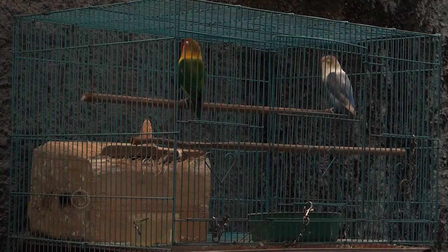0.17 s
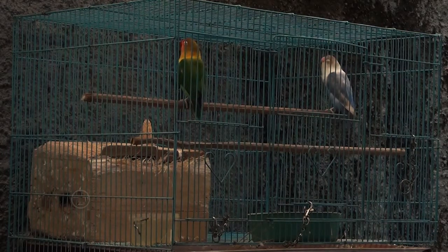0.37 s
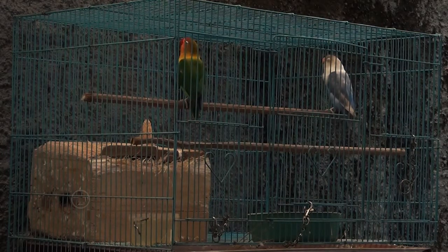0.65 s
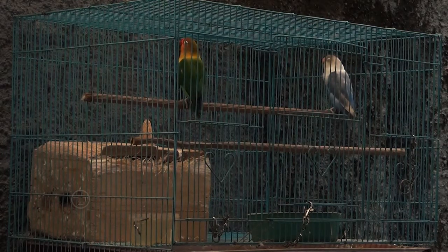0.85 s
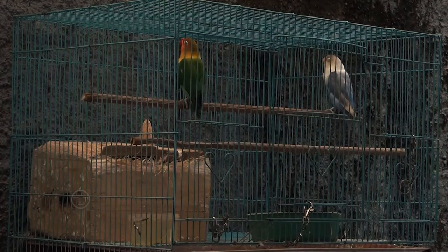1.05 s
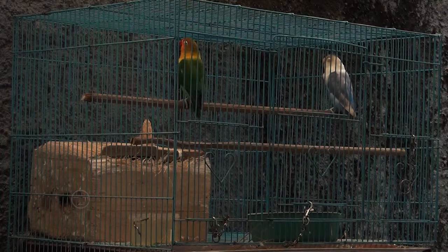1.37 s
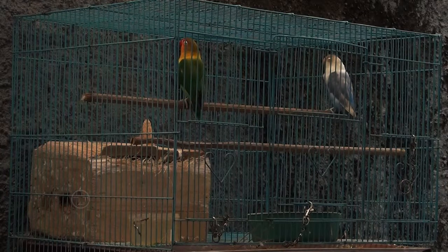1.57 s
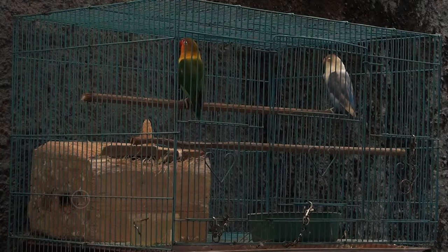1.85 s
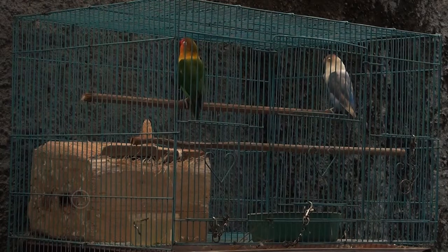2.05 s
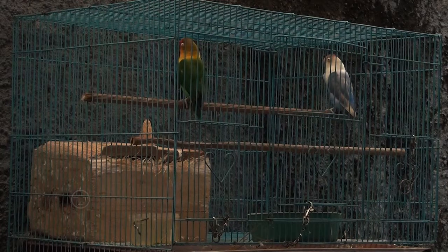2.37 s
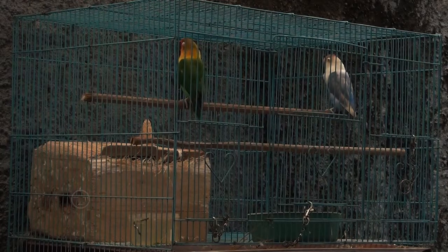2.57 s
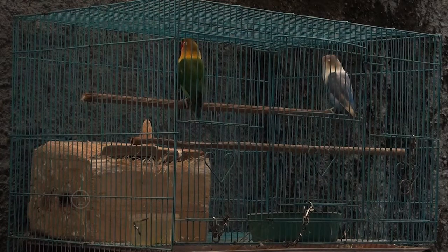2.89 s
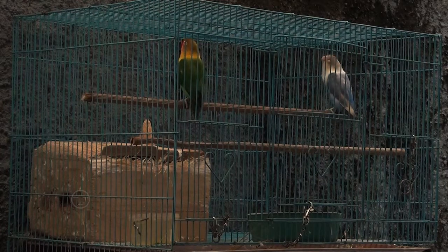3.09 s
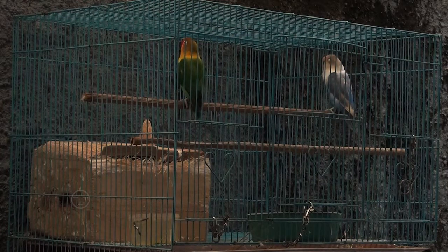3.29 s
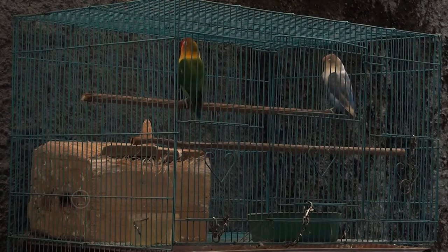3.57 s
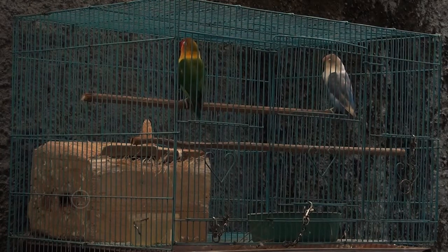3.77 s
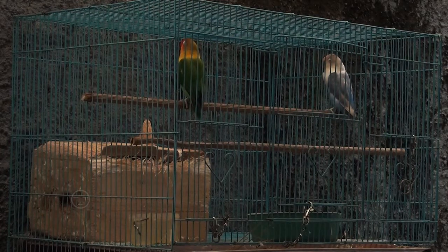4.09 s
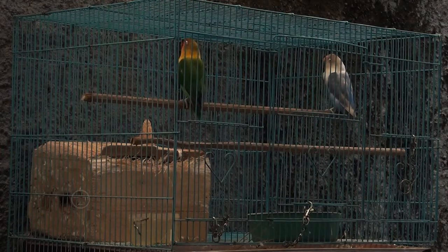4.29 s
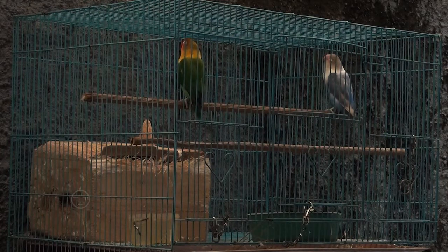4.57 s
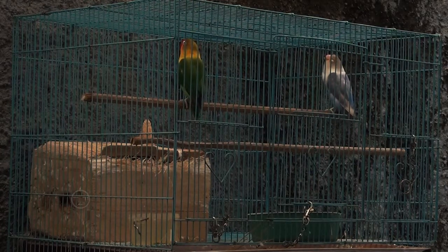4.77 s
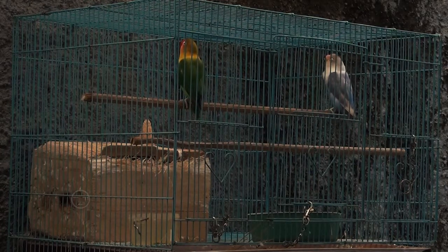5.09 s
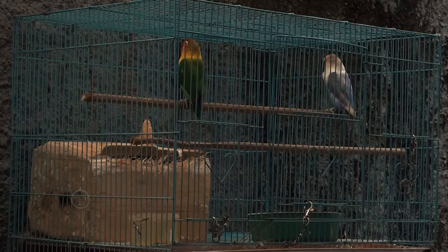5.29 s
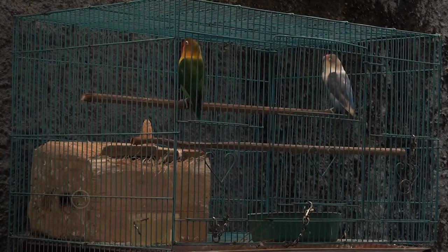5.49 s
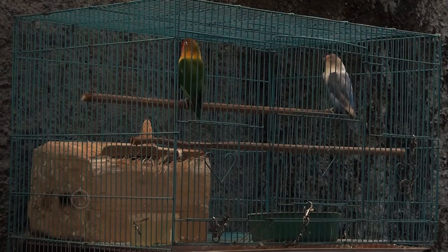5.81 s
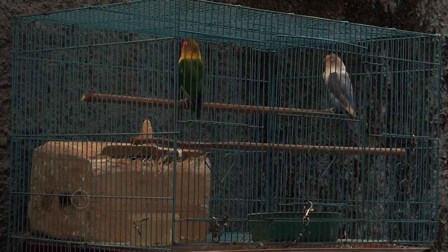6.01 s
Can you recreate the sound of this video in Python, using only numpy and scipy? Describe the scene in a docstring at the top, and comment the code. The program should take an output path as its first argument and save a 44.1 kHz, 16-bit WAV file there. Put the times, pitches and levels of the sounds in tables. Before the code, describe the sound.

Two lovebirds call from a wire cage straight ahead, with hard walls adding a short ring to every sound. Faint, dull outdoor noise and a far-off idling engine continue underneath for all six seconds. Two quick bursts of shrill chirps come at about 0.2 and 0.7 seconds. A very faint, distant tone sounds briefly at 1.3 seconds. A lower chirp follows at 2.1 and a thin squeak at 2.7. From 3 to 3.5 seconds there is rapid chatter, tiny sliding notes breaking from whistle into rasp, with dry ticks between them. A few light taps hit the cage wires around 4.4 seconds. A second run of chatter lasts from 4.6 to 5.2 seconds. A short, clear whistle comes at 5.6, and a last quiet chirp at about 6. The birds are much louder than the background, which dips slightly after the loudest calls.

```python
"""Two lovebirds call in a wire cage between hard walls, over outdoor noise and a far-off idling engine.
First come two chirps, a faint distant tone, a low chirp and a squeak. A run of chatter follows at 3 s,
then taps on the wires, more chatter at 4.6 s, a clear whistle and a last quiet chirp.
Each bird's voice box makes quick slides in pitch that break from whistle into rasp, with dry ticks between.
The walls ring after every call, and an automatic volume control turns the loud ones down."""
import sys
import numpy as np
from scipy import signal
from scipy.fft import rfft, irfft, next_fast_len
from scipy.io import wavfile
from scipy.ndimage import uniform_filter1d, minimum_filter1d

SR = 44100
rng = np.random.default_rng(int(sys.argv[2]) if len(sys.argv) > 2 else 0)


def generate_wav(signal):
    """Clip the signal to [-1, 1] and save it as 16-bit WAV at the path in sys.argv[1]."""
    frames = np.transpose(np.atleast_2d(signal))
    scaled = np.clip(frames, -1, 1) * 32767
    pcm = np.round(scaled).astype(np.int16)
    wavfile.write(sys.argv[1], SR, pcm)


N = 270774
CUTOFF_HZ = 16000  # top of the treble
ATTACK_S, RELEASE_S = .002, .003  # fade-in and fade-out of every bird note


def from_db(db):
    """Turn decibels into a number to multiply by."""
    return 10 ** (np.asarray(db) / 20)


def rms_one(x):
    """Scale a signal to an average power of 1."""
    return x / np.sqrt(np.mean(x ** 2) + 1e-20)


def at_hz(points, hz):
    """Read between a table's rows, giving every octave equal room."""
    freqs, values = np.transpose(points)
    return np.interp(np.log(np.maximum(hz, 1)), np.log(freqs), values)


def coloured(spectrum, size):
    """Noise of power 1, its bass and treble shaped by a table."""
    hz = np.fft.rfftfreq(size, 1 / SR)
    return rms_one(irfft(rfft(rng.standard_normal(size)) * from_db(at_hz(spectrum, hz)), size))


def wobble(rate_hz, size):
    """A smooth random wiggle of about 1 either way, mostly slower than rate_hz."""
    padded = next_fast_len(size + SR // 8)
    hz = np.fft.rfftfreq(padded, 1 / SR)
    slow_spectrum = rfft(rng.standard_normal(padded)) / (1 + (hz / rate_hz) ** 2)
    return rms_one(irfft(slow_spectrum, padded))[:size]


def gate(t, length_s, attack_s, release_s):
    """Fade in, hold, fade out."""
    ramp = np.clip(np.minimum(t / attack_s, (length_s - t) / release_s), 0, 1)
    return np.sin(np.pi / 2 * ramp) ** 2


def add(track, s, sound):
    """Mix a sound into the track at s seconds."""
    start = int(np.clip(round(s * SR), 0, N))
    track[start:start + len(sound)] += sound[:N - start]


# The outdoor noise from bass to treble: f/Hz, relative level/dB
AIR_SPECTRUM = [(20, -66), (30, -28.5), (45, -20), (60, -2), (90, -17), (140, -6), (215, -6.5), (300, -6),
                (400, -7), (600, -7.5), (1000, -10), (1400, -11.5), (2000, -13.5), (4500, -26.5),
                (9000, -34), (16000, -35.5)]
# How the outdoor noise swells and sinks: t/s, level/dB
AIR_SWELL = [(0, -45.5), (.9, -37.5), (1.5, -40.5), (2.1, -45), (2.7, -45), (3.5, -37.5), (4, -45),
             (4.5, -42), (5.2, -42), (6.14, -41.5)]
def outdoor_air(side_db=-12):
    """Dull outdoor noise, with the same bass on the left and right."""
    t = np.arange(N) / SR
    midrange = signal.butter(3, [450, 5000], "band", fs=SR, output="sos")
    side = signal.sosfilt(midrange, coloured(AIR_SPECTRUM, N)) * [[1], [-1]]  # left +, right -
    swell = from_db(np.interp(t, *np.transpose(AIR_SWELL)))
    return swell * (coloured(AIR_SPECTRUM, N) + from_db(side_db) * side)


def far_tone(start_s=1.33, length_s=0.28, hz=808, level_db=-46.5, fade_s=0.044):
    """One faint, pure tone from far away."""
    t = np.arange(N) / SR
    tone = np.sqrt(2) * from_db(level_db) * np.sin(2 * np.pi * hz * t)
    return tone * gate(t - start_s, length_s, fade_s, fade_s)


# The tones in the engine's hum: multiple of the firing rate, relative level/dB
ENGINE_TONES = [(2, -10), (4, -12), (5, -2), (6, 1), (7, 0.5), (8, -7), (10, -4.5), (11, -5), (12, -3.5),
                (13, -1), (14, -5.5), (16, -11.5), (18, -8), (19, -8.5), (22, -18.5), (24, -13)]
# How the engine swells and sinks: t/s, level/dB
ENGINE_SWELL = [(0, -44), (.9, -38), (2, -40), (2.8, -42), (3.5, -36.5), (4, -44.5), (4.5, -42),
                (6.14, -45.5)]
def engine(firing_hz=29.65, rise_hz_per_s=.3, waver=0.0034, waver_hz=7.7,
           fading_db=3.0, scatter_rad=1.12, surge_db=2.0, surge_hz=12):
    """An engine slowly gathers speed. Its tones arrive by many paths, so each fades on its own."""
    t = np.arange(N) / SR
    rate = (firing_hz + rise_hz_per_s * t) * (1 + waver * wobble(waver_hz, N))
    phase = 2 * np.pi * np.cumsum(rate) / SR
    fade_times = np.linspace(0, t[-1], 40)
    hum = 0
    for multiple, db in ENGINE_TONES:
        fade = np.interp(t, fade_times, from_db(db + fading_db * rng.standard_normal(len(fade_times))))
        offset = scatter_rad * rng.standard_normal()  # roughly in step: a soft putter
        hum = hum + fade * np.sin(multiple * phase + offset)
    level_db = np.interp(t, *np.transpose(ENGINE_SWELL)) + surge_db * wobble(surge_hz, N)
    return rms_one(hum) * from_db(level_db)


# How long the walls ring: f/Hz, time to fade by 60 dB/s
RING_TIMES = [(1500, 0.46), (2700, 0.65), (4000, 0.57), (5500, 0.51), (8000, 0.49), (12000, 0.44),
              (16000, .35)]
def wall_ring(x, wet_db=-0.5, side_db=-10, first_echo_s=0.0039, side_cut_hz=8000):
    """Countless echoes blur into a ring, much alike left and right. The highest treble dies first."""
    t = np.arange(SR) / SR
    hz = np.fft.rfftfreq(SR, 1 / SR)
    white, tail = rfft(rng.standard_normal((2, SR))), 0
    edges = np.geomspace(500, SR / 2, 14)
    for low, high in zip(edges, edges[1:]):
        band = irfft(white * ((hz >= low) & (hz < high)), SR)
        tail = tail + band * from_db(-60 * t / at_hz(RING_TIMES, np.sqrt(low * high)))
    # scale the tail so that it neither adds nor loses energy near 6000 Hz
    tail = tail * (t > first_echo_s) * np.sqrt(2 * np.log(1000) / (SR * at_hz(RING_TIMES, 6000)))
    mid, side = signal.fftconvolve(x[None], tail, axes=1)[:, :N]
    side = signal.sosfilt(signal.butter(1, side_cut_hz, fs=SR, output="sos"), side)
    return from_db(wet_db) * (mid + from_db(side_db) * side * [[1], [-1]])


# Bounces off the nearby walls: delay/s, relative level/dB
WALL_BOUNCES = [(.0034, -11.5), (.0079, -22), (.044, -12.5)]
def wall_echoes(x, smear_s=.003):
    """Single echoes, each spread a little in time because the walls are rough."""
    out = np.zeros(N)
    for delay_s, db in WALL_BOUNCES:
        smear = rng.standard_normal(int(smear_s * SR) + 1)
        add(out, delay_s - smear_s / 2, from_db(db) * np.convolve(x, smear / np.linalg.norm(smear)))
    return out


# Taps on the cage: t/s, starting level/dB
WIRE_TAPS = [(1.873, -47), (3.722, -43.5), (4.335, -36), (4.387, -29.5), (4.455, -30.5), (4.476, -35),
             (4.499, -37)]
def cage_taps(fade_s=0.068):
    """Claws and beaks hit the wires, each time making a short, bright burst of noise."""
    out, t = np.zeros(N), np.arange(SR // 10) / SR
    spectrum = [(300, -18), (1500, 0.5), (5000, -5.5), (15000, -14.0)]  # f/Hz, relative level/dB
    for s, db in WIRE_TAPS:
        add(out, s, coloured(spectrum, len(t)) * from_db(db - 60 * t / fade_s))
    return out


# How throat and beak boost or soften each frequency: f/Hz, relative level/dB
THROAT_SHAPE = [(1000, -18), (1600, -2.5), (2200, -5), (3300, 6.5), (4500, 10.5), (5600, 7), (6600, -2),
                (7600, 6.5), (8800, -3), (10500, -3.5), (12200, -6), (13400, -13), (16000, -47)]
def voice_box(length_s, arc_hz, level_db, swell_db, rough, tilt_db, jitter=0.13, jitter_hz=700,
              flutter_db=8, flutter_hz=260, rasp_db=-9.5, flicker_db=3.5, flicker_hz=110):
    """A bird sings one sliding note. When it is rough, pitch and loudness shake and the air hisses."""
    t = np.arange(0, length_s + RELEASE_S, 1 / SR)
    progress = np.linspace(0, 1, len(t))
    pitch = np.polyval(np.polyfit([0, .5, 1], arc_hz, 2), progress)  # curve through the three pitches
    shaky_pitch = pitch * (1 + jitter * rough * wobble(jitter_hz, len(t)))
    phase = 2 * np.pi * np.cumsum(shaky_pitch) / SR
    k = np.arange(1, 9)[:, None]  # harmonics: tones at 1 to 8 times the pitch
    gains = from_db(at_hz(THROAT_SHAPE, k * pitch) + tilt_db * np.log2(k)) * (k * pitch < CUTOFF_HZ)
    # each harmonic flickers on its own
    gains = gains * from_db(flicker_db * wobble(flicker_hz, gains.size).reshape(gains.shape))
    tone = np.sum(gains * np.sin(k * phase), axis=0) / np.sqrt(np.sum(gains ** 2, axis=0) / 2)
    puffs = 1 + np.sin(phase)  # one puff of air for each vibration
    rasp = from_db(rasp_db) * rough ** 1.5 * coloured(THROAT_SHAPE, len(t)) * puffs
    shake = rms_one(from_db(flutter_db * rough * np.tanh(wobble(flutter_hz, len(t)))))
    breath = gate(t, t[-1], ATTACK_S, RELEASE_S) * from_db(level_db + swell_db * (progress - .5))
    return (tone + rasp) * shake * breath


# Ticks, single puffs through the voice box: t/s, f/Hz, starting level/dB
BIRD_TICKS = [(.685, 2245, -8.5), (0.695, 3170, 3), (2.183, 2495, -8.5), (2.722, 2313, -19.5),
              (2.727, 2424, -18), (2.949, 2490, -14), (2.957, 2710, -3.5), (3.004, 3620, -6),
              (3.081, 4070, -5), (4.636, 3380, -12), (4.687, 3240, -10), (4.762, 4717, 3), (4.992, 4190, 1),
              (5.430, 1980, -19.5), (5.438, 1934, -17), (5.4462, 2015, -22), (5.938, 3570, -21)]
# Notes, each one slide in pitch on a swelling or fading breath: t/s, length/s, start f/Hz, middle f/Hz,
# end f/Hz, level/dB, swell over the note/dB, roughness (0 to 1), tilt of the harmonics/(dB per octave)
BIRD_NOTES = [ (0, 0.034, 3300, 2627, 1980, -28, -4.5, 0.81, -15.5),
              (.203, .019, 2740, 2266, 2530, -7.5, 12, 0.03, -3),
              (.222, 0.027, 2576, 2997, 2430, -8, -18, 0.23, -2),
              (0.254, 0.029, 3885, 4944, 4540, -6, 2, 0.24, -5.5),
              (0.281, 0.028, 3740, 3470, 3400, -9, 2, 0.21, -11),
              (0.312, 0.065, 1802, 1650, 1830, -17, 0, 0.99, -4),
              (0.372, 0.013, 2280, 2570, 2870, -11.5, -5, 0.28, -8),
              (.393, 0.015, 3835, 3710, 4800, -3, 2.5, 0.33, -14),
              (0.414, 0.021, 5580, 5800, 5760, -12.5, -2, 0.31, -3),
              (0.7, 0.027, 3213, 3634, 4380, -3.5, 12, 0.3, -3.5),
              (.731, .028, 4525, 4880, 4480, -9, -11, 0.29, 2),
              (.763, .024, 4755, 4820, 4370, -9.5, 1, 0.37, -1),
              (0.785, 0.02, 3770, 3540, 3660, -4, 5, 0.1, -15),
              (.81, .014, 5760, 6030, 6130, -11, -10, 0.22, -7),
              (0.83, .029, 4187, 4368, 4370, -5, -7.5, .08, -3.5),
              (2.072, 0.026, 1514, 1927, 2190, -17, 17, 0.22, -12),
              (2.101, .018, 2370, 3266, 2730, -12.5, -4, 0.32, -5.5),
              (2.112, 0.021, 2210, 2158, 2150, -17, -16, 0.2, -15),
              (2.152, .027, 2394, 2950, 2797, -14, 4, 0.44, -15.5),
              (2.187, 0.023, 4273, 4100, 4500, -12, -10, 0.25, -4.5),
              (2.72, 0.018, 5973, 6170, 6040, -14.5, 14, 0.24, 0.5),
              (2.738, 0.05, 6040, 6107, 6050, -17, 2, .08, -24),
              (2.964, .04, 2390, 2245, 2304, -4, -8, 0.09, -2),
              (3.005, 0.042, 2385, 2290, 2340, -15, -9.5, 0.08, -4),
              (3.011, 0.03, 5650, 5720, 5470, -11, -3, 0.33, -7),
              (3.038, .039, 3577, 3528, 4090, -2.5, -2, 0.16, -13.5),
              (3.084, .04, 5810, 6270, 6030, -10.5, -13, 0.04, -6),
              (3.125, .026, 3865, 3700, 3650, -8, 6, 0.28, -5.5),
              (3.15, 0.047, 1903, 2142, 2167, -8, 3, .48, -8),
              (3.196, 0.016, 3635, 3457, 2970, 0, 9, 0.31, -8),
              (3.214, .013, 5310, 4920, 3930, -2.5, -6, 0.26, -2),
              (3.227, 0.033, 3896, 3870, 4210, -5, 2, 0.34, -6.5),
              (3.254, 0.052, 5560, 5736, 5610, -8, 1, 0.17, -4.5),
              (3.389, 0.029, 1563, 1672, 1650, -20, -18, 0.71, -6),
              (3.415, 0.019, 2465, 2222, 4090, -11.5, 1, 0.09, -14.5),
              (3.44, 0.011, 5450, 5360, 5390, -12.5, -6, 0.08, -23),
              (4.227, 0.0092, 3350, 3057, 3060, -17, -11, 0.77, -7),
              (4.326, 0.027, 1563, 1507, 1490, -27, 1, 0.13, -16.5),
              (4.642, 0.024, 2445, 2720, 2455, -2.5, 12, 0.35, -2),
              (4.673, .03, 2406, 2350, 2580, -7.5, -7, 0.18, 1.5),
              (4.701, 0.0063, 5880, 6100, 6000, -1.5, 0, 0.05, -12),
              (4.714, 0.024, 4620, 4650, 3890, -3.5, -4, .28, -4),
              (4.731, 0.031, 3486, 4060, 4310, -6.5, -6, 0.14, -8),
              (4.77, 0.059, 6120, 6220, 6080, -10, -2, 0.11, -8),
              (4.841, 0.014, 1720, 1713, 1780, -14.5, 13, 0.42, -6),
              (4.853, 0.026, 3520, 3255, 2300, -6.5, 3, 0.34, -6.5),
              (4.883, 0.037, 2258, 2260, 2200, -6, 3, 0.22, -4),
              (4.923, 0.028, 2705, 2664, 2800, -16.5, -3, 0.39, -0.5),
              (4.957, 0.024, 3946, 3830, 4045, -7, 6.5, 0.25, -2),
              (4.994, .03, 5990, 5780, 5800, -10.5, -5, 0.26, -3),
              (5.076, 0.014, 1734, 1688, 1830, -21, 18, 0.37, -15),
              (5.084, 0.032, 2500, 2680, 2430, -20.5, 2, .35, -11),
              (5.118, 0.014, 3060, 3390, 3130, -7, 9, 0.16, -12.5),
              (5.138, 0.017, 2623, 2756, 4490, -9.5, -3, 0.25, -9.5),
              (5.45, 0.033, 2067, 1963, 1890, -30, -1, .58, -25),
              (5.545, 0.019, 3350, 3670, 4140, -24, 13, .05, -8.5),
              (5.563, .034, 4142, 4201, 3886, -10.5, 10, 0, -5.5),
              (5.6, 0.027, 3853, 3817, 3798, -12, -3, 0, -8),
              (5.949, 0.017, 2630, 2434, 3060, -26.5, 3, .2, -14.5),
              (5.991, 0.012, 2900, 2930, 2780, -22.5, -3, 0, -11),
              (6.011, 0.036, 2790, 2396, 2294, -21, 3, 0, -14), ]
def lovebirds(tick_s=0.0039, tick_rough=0.43, tick_fall_db=6, tick_tilt_db=-7, lowest_hz=1500):
    """The birds sing their notes and ticks. Such small throats give out no bass."""
    out = np.zeros(N)
    for s, length_s, *arc_hz, db, swell_db, rough, tilt_db in BIRD_NOTES:
        add(out, s - ATTACK_S / 2, voice_box(length_s, arc_hz, db, swell_db, rough, tilt_db))
    for s, hz, db in BIRD_TICKS:
        middle_db = db - tick_fall_db / 2
        tick = voice_box(tick_s, (hz, hz, hz), middle_db, -tick_fall_db, tick_rough, tick_tilt_db)
        add(out, s - ATTACK_S, tick)
    return signal.sosfilt(signal.butter(6, lowest_hz, "high", fs=SR, output="sos"), out)


def scene():
    """The cage stands straight ahead, with walls around it and the outdoors behind."""
    cage = lovebirds() + cage_taps()
    return cage + wall_echoes(cage) + wall_ring(cage) + outdoor_air() + far_tone() + engine()


def record(dry, threshold_db=-8.5, release_db_per_s=13, window_s=0.0047, ceiling=.92):
    """The volume drops at once on loud calls and creeps back. Peaks are held down, top treble is cut."""
    power = uniform_filter1d(np.mean(dry ** 2, axis=0), int(window_s * SR))
    excess_db = np.maximum(10 * np.log10(np.abs(power) + 1e-12) - threshold_db, 0)
    recovery_db = release_db_per_s * np.arange(N) / SR
    drop_db = np.maximum.accumulate(excess_db + recovery_db) - recovery_db
    levelled = dry * from_db(-drop_db)
    safe_gain = np.minimum(1, ceiling / (np.max(np.abs(levelled), axis=0) + 1e-9))
    limited = levelled * uniform_filter1d(minimum_filter1d(safe_gain, size=129), size=129)
    return signal.sosfiltfilt(signal.cheby2(14, 50, CUTOFF_HZ + 600, fs=SR, output="sos"), limited)


dry = scene()
out = record(dry)
generate_wav(out)
```